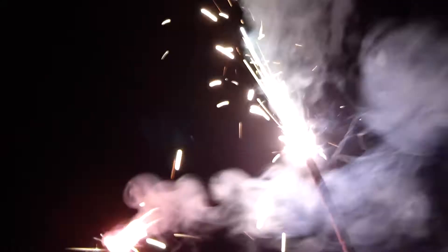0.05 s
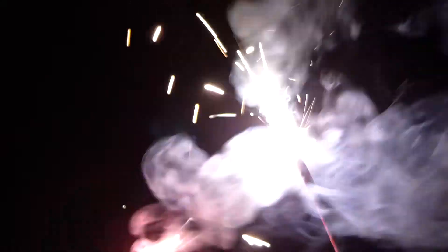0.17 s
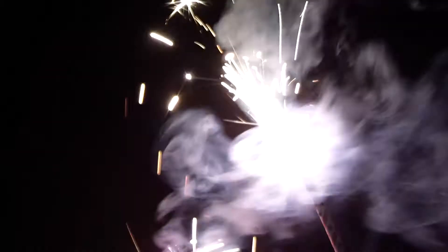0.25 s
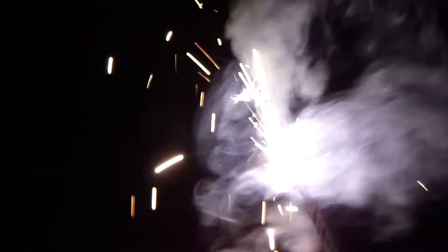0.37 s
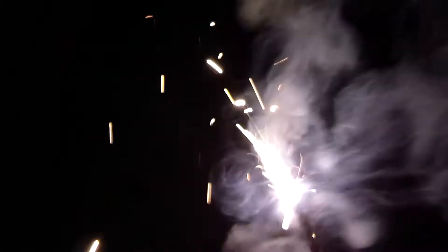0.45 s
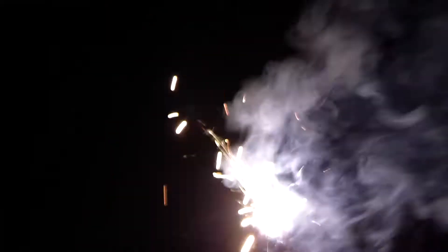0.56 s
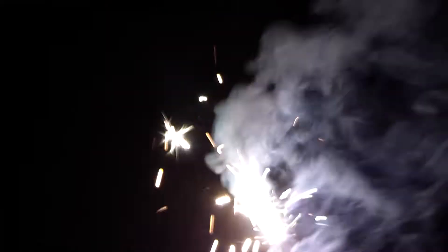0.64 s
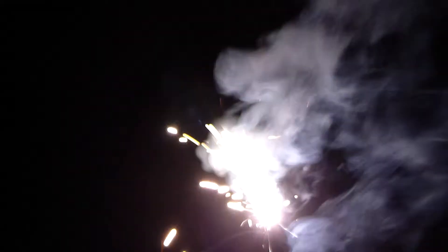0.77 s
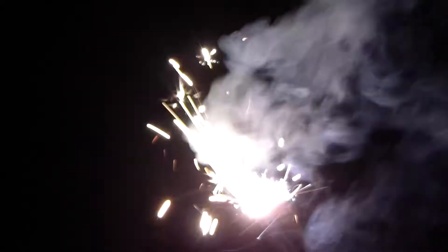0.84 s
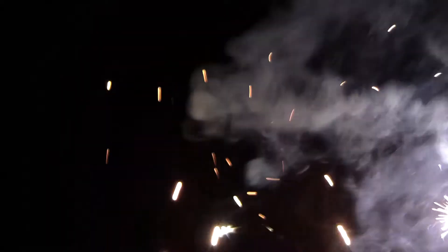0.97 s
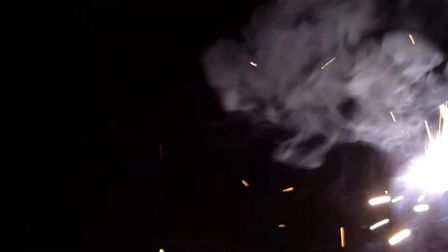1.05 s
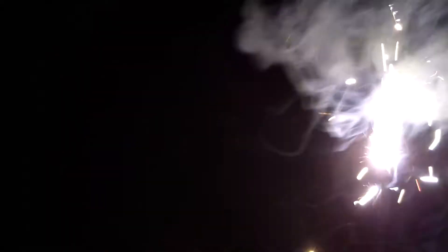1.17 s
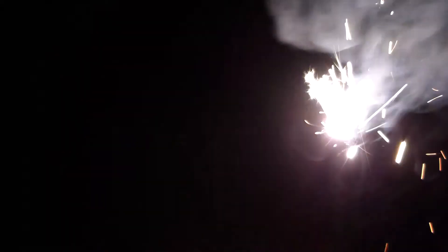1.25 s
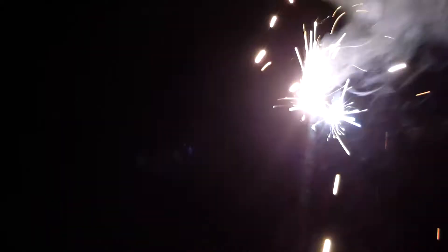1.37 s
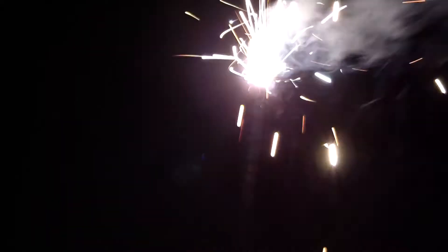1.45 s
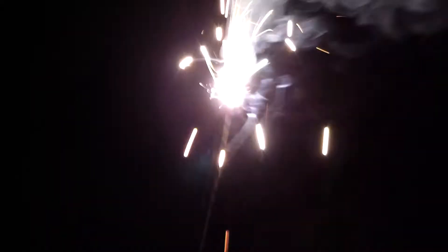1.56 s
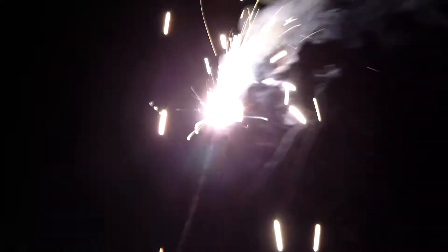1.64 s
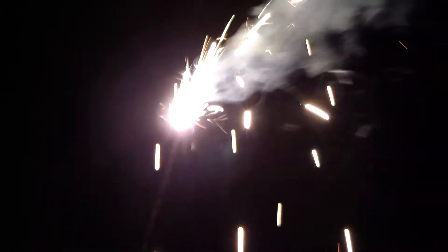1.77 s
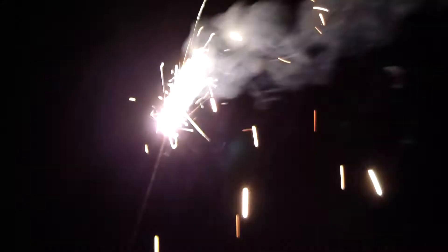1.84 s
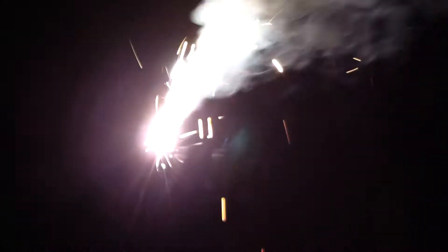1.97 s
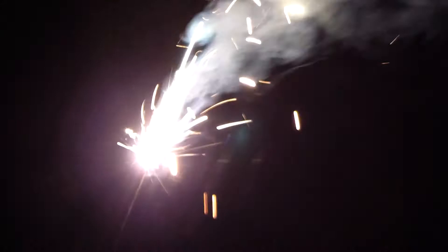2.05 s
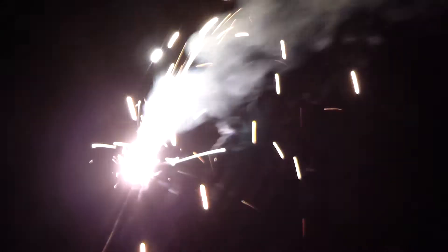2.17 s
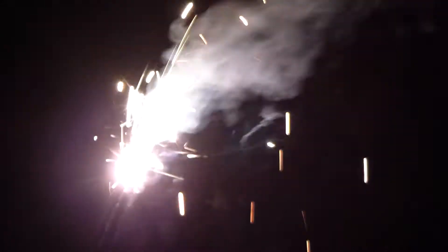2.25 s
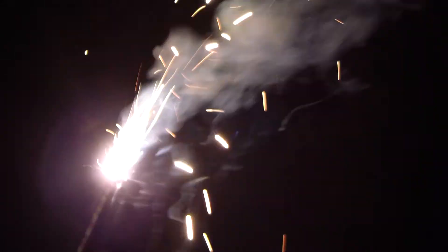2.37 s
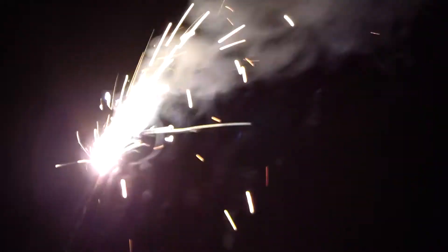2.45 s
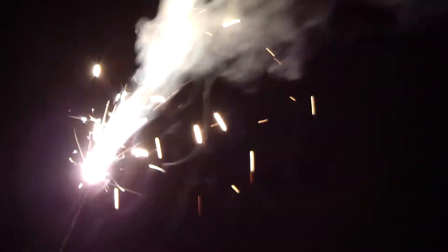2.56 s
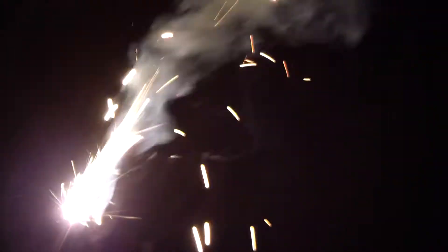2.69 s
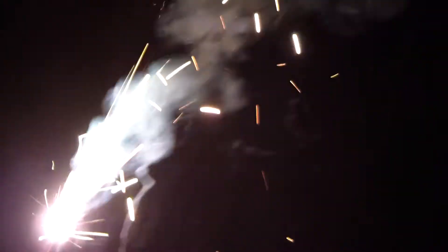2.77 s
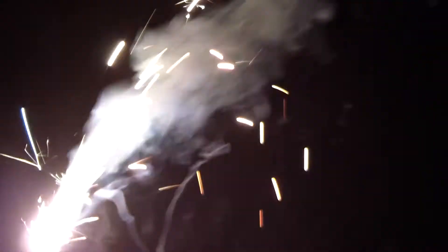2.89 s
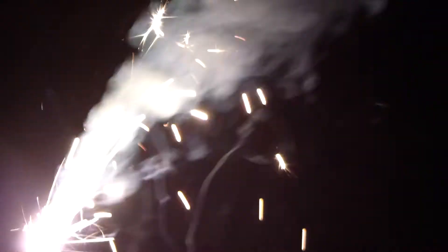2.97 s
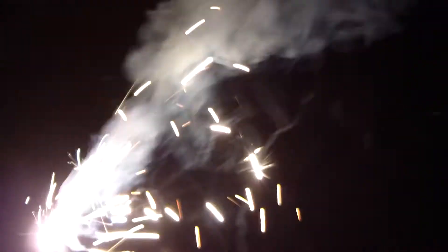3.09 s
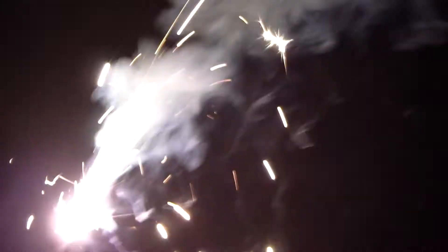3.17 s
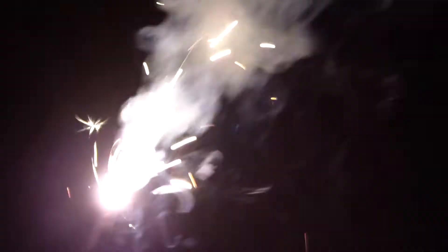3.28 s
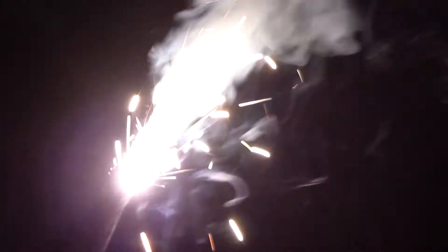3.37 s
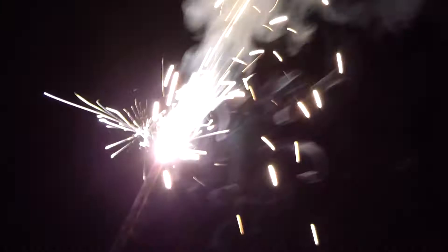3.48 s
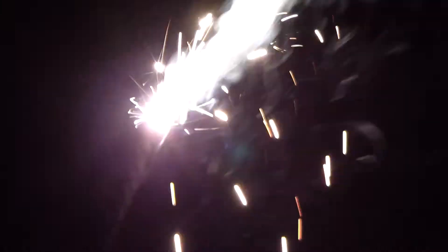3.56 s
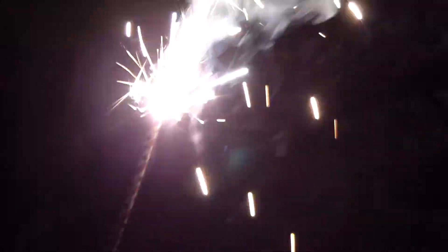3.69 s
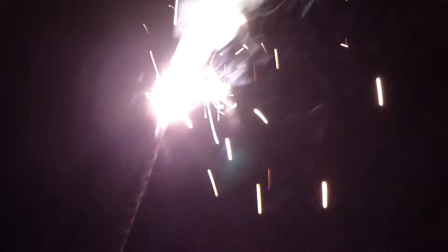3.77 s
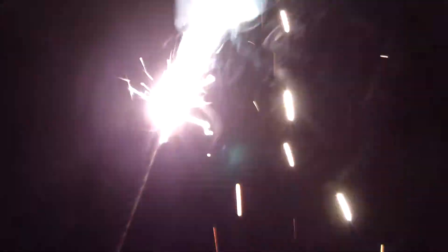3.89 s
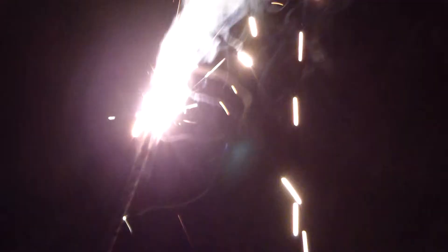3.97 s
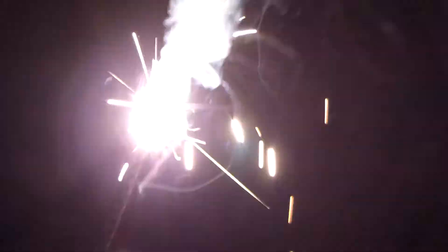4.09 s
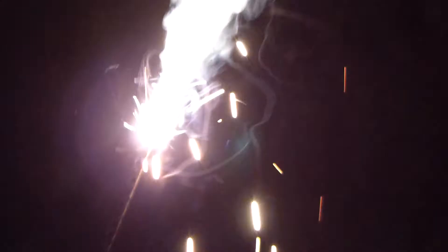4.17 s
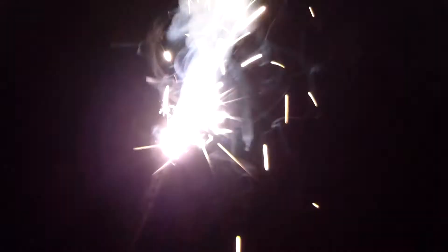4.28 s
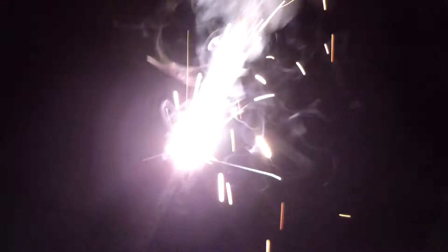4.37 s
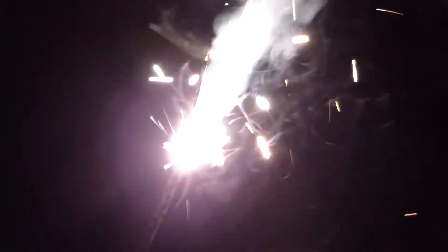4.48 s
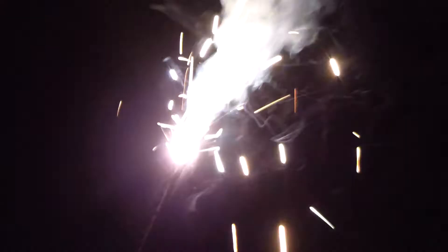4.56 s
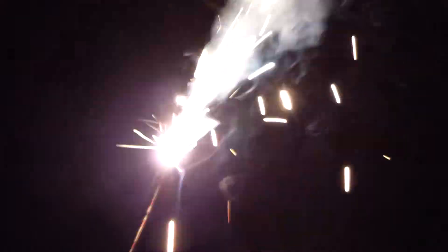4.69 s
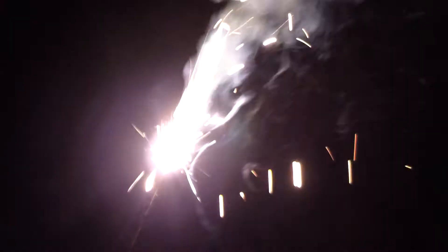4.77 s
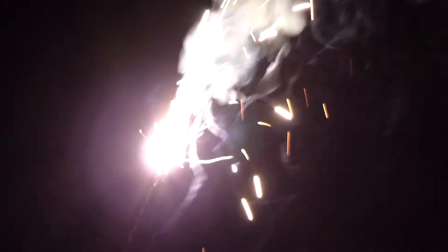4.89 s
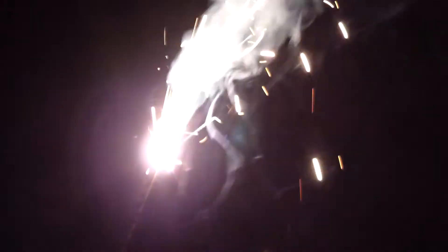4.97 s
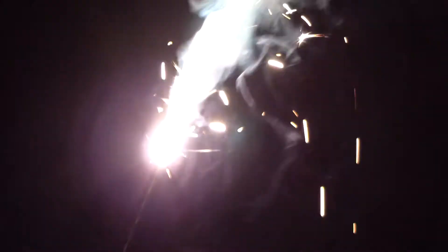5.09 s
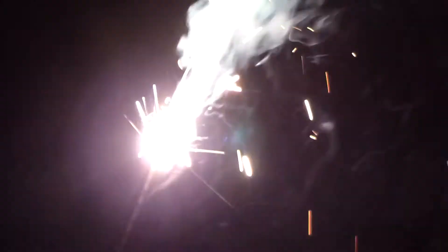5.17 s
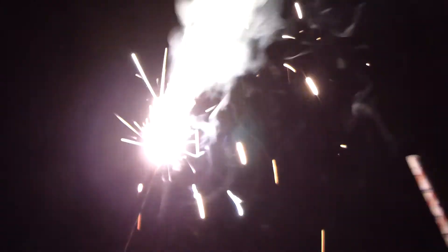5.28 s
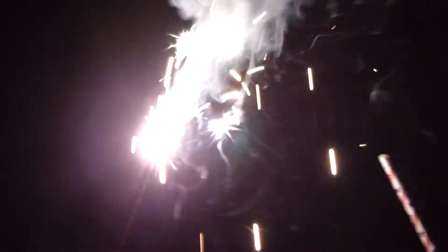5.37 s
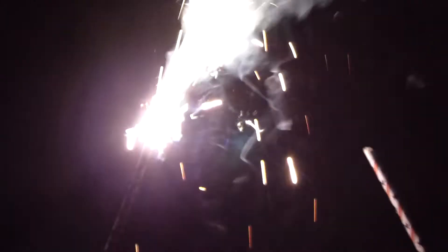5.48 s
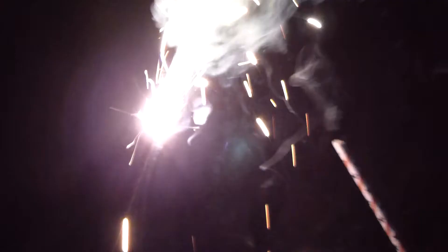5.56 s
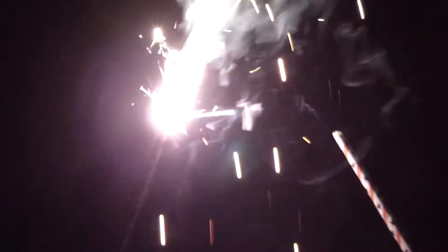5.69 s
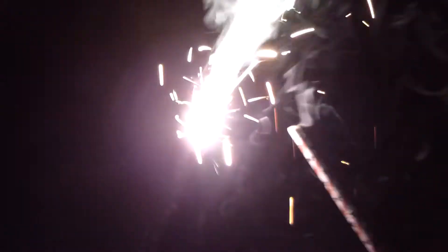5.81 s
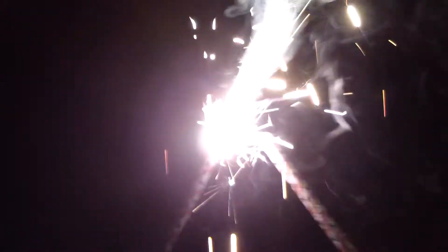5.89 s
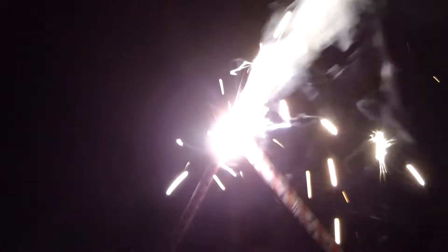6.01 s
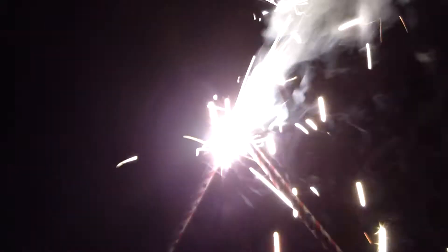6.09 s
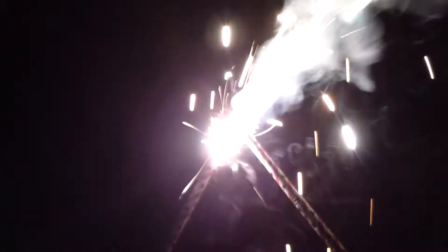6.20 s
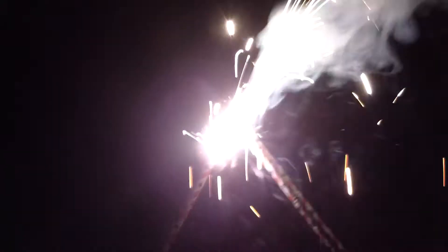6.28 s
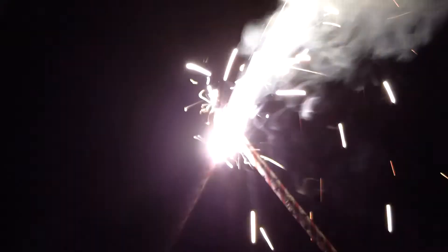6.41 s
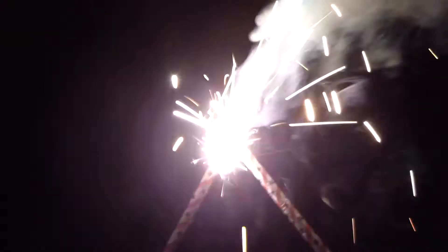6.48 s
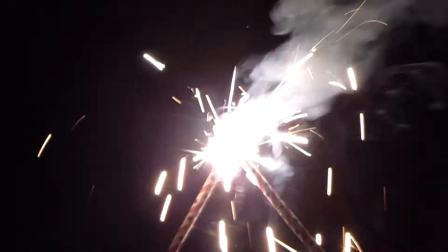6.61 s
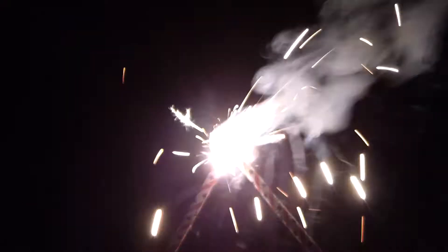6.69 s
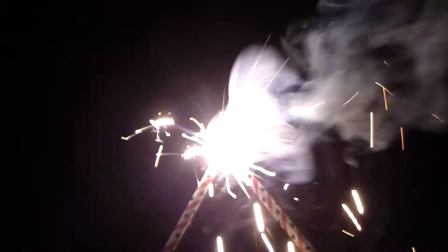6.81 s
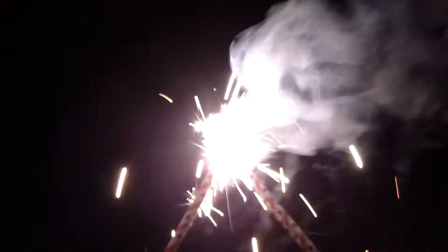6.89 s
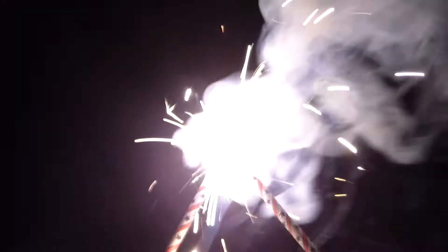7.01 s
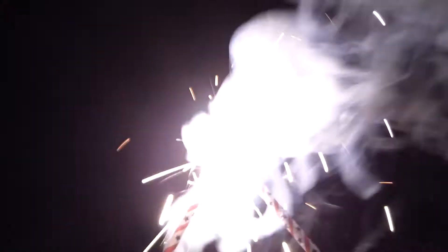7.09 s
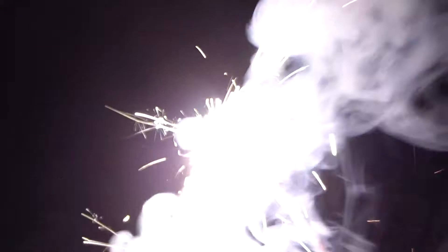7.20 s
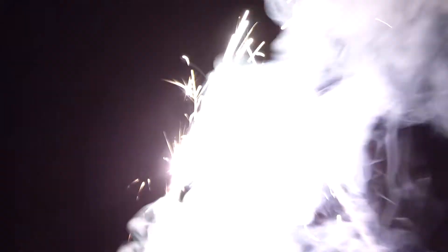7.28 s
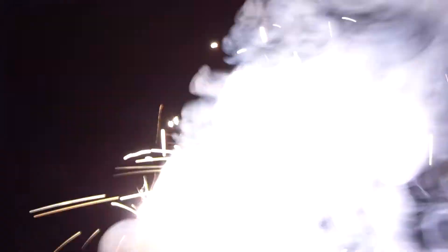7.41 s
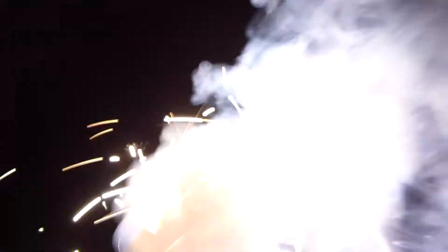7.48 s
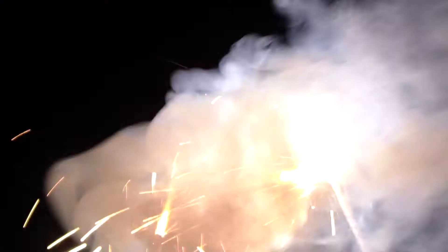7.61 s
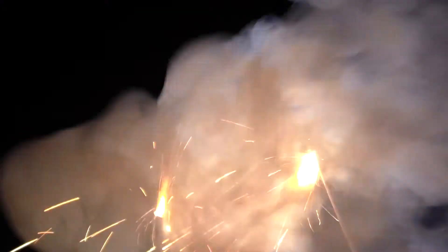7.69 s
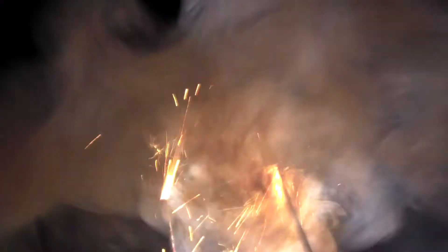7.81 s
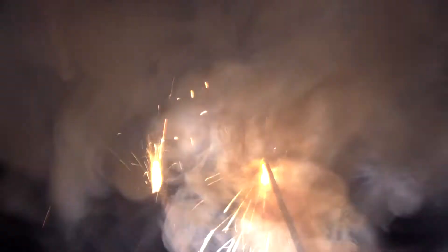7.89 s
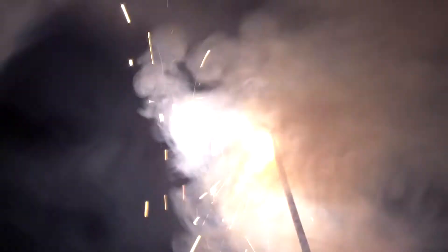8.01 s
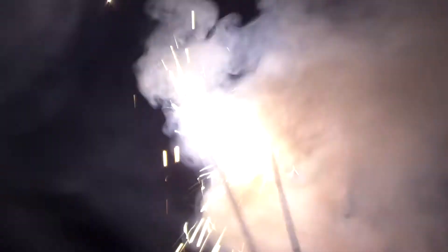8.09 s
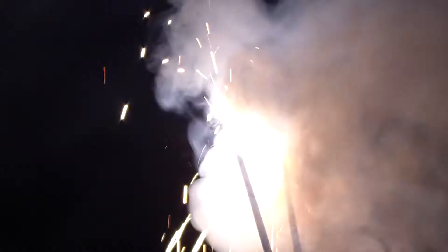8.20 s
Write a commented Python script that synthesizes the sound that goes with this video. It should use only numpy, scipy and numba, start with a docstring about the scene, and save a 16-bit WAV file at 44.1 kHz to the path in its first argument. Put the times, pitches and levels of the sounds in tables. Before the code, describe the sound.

Bright, gritty sparkler fizz outdoors with dense dry crackles and hard pops, swelling near the end into a louder, fuller rush of flame.

```python
"""Hand-held sparklers burn close to a phone outdoors at night: thousands of tiny shock pulses from bursting metal
grains make a sizzle that comes in spurts and lulls, and pops stand out as sharp bursts with fragments.
Shaped noise makes the flame's roar, which swells when a second stick lights, and the low rumble of a light wind.
A nearby surface (the phone or the hand) returns a short echo that follows the stick."""
import sys
import numpy as np
from scipy import signal
from scipy.fft import rfft, irfft, next_fast_len
from scipy.io import wavfile
from scipy.ndimage import uniform_filter1d, map_coordinates
from numba import njit

SR = 44100
rng = np.random.default_rng(int(sys.argv[2]) if len(sys.argv) > 2 else 0)


def materialize(psi):
    """Save the field psi as 16-bit PCM at rate SR to the path in sys.argv[1].

    A 1-D psi becomes a single channel; in a 2-D psi each row is a channel.
    """
    bounded = np.clip(np.atleast_2d(psi).T, -1, 1)
    quanta = np.round(bounded * 32767).astype(np.int16)
    wavfile.write(sys.argv[1], SR, quanta)


N = 363825  # samples, 8.25 s
MS, US = 1e-3, 1e-6  # a millisecond and a microsecond, in seconds

# The tone of one burst after the air and the microphone. Each row: frequency in Hz, relative level in dB.
SPARK_TONE = [(90, -30), (150, -12.5), (409, -16), (549, -12.5), (798, -15.5), (1070, -11.5), (1410, -11.5),
              (4420, -5.5), (6680, -5.5), (8300, -2.5), (10700, 0.5), (15300, -0.5), (18000, -7)]


def undb(db):
    """Turn decibels into a plain factor."""
    return 10 ** (np.asarray(db) / 20)


def unit(x):
    """Scale a signal to an average (RMS) strength of 1."""
    return x / np.sqrt(np.mean(x ** 2))


def columns(table):
    """Draw straight lines between the rows: each column after the time becomes one value a sample."""
    seconds, *rest = np.transpose(table)
    return [np.interp(np.arange(N) / SR, seconds, column) for column in rest]


def response(points, size=2048):
    """Make a click with the given tone whose energy comes as early as possible (folded cepstrum)."""
    hz, db = np.transpose(points)
    grid = np.maximum(np.arange(size // 2 + 1), .5) * SR / size
    level = undb(np.interp(np.log(grid), np.log(hz), db))
    cepstrum = irfft(np.log(level))
    # folding the second half onto the first leaves nothing before time zero
    cepstrum[1:size // 2] *= 2
    cepstrum[size // 2 + 1:] = 0
    return irfft(np.exp(rfft(cepstrum)))


def colour(x, points):
    """Give a signal the tone listed in a table."""
    return signal.fftconvolve(x, response(points))[:N]


def walk(rate):
    """A smooth random wavering with an RMS of 1: about `rate` new levels a second, averaged twice."""
    hold = int(SR / rate)
    steps = np.repeat(rng.standard_normal(N // hold + 1), hold)
    smooth = uniform_filter1d(uniform_filter1d(steps, hold), hold)
    return unit(smooth[:N])


def wind(wind_db, own_db=-15.0):
    """Low gusts buffet both ports nearly alike, and single puffs knock them: a quick dip, a slow rebound."""
    # The tone of the rumble. Each row: frequency in Hz, relative level in dB.
    wind_tone = [(12, -8), (22, 0), (40, -1), (62, -4), (80, -15), (250, -24), (600, -50)]
    # Puffs of air. Each row: time in seconds, level in dB, length scale in ms.
    puff_list = [(2.143, -32, 1.8), (2.187, -22.5, 2.1)]
    buffet = undb(2.0 * walk(33))
    shared, own = (unit(colour(rng.standard_normal(N) * buffet, wind_tone)) for _ in range(2))
    t, puffs = np.arange(N) / SR, 0
    for start, db, ms in puff_list:
        u = (t - start) / (ms * MS)
        dip = np.exp(-(2 * u) ** 2)
        rebound = 0.29 * np.exp(-((u - 2.5) / 2.3) ** 2)
        puffs = puffs + undb(db) * (rebound - dip)
    # a weak extra part pushes the two ports in opposite directions
    opposed = undb(own_db) * own * np.array([[-1], [1]])
    return puffs + undb(wind_db) * (shared + opposed)


def flame(roar_db):
    """The flame is a turbulent jet of gas: shaped noise that flutters quickly."""
    # The tone of the roar. Each row: frequency in Hz, relative level in dB.
    roar_tone = [(35, -41), (60, 2), (220, 2.5), (413, -5), (520, -1.5), (1110, 1), (1480, 0), (5560, -1.5),
                 (7000, -1.5), (8100, 1), (9000, -21), (11700, -59), (19800, -120)]
    flutter = undb(2.0 * walk(40) + 2.0 * walk(300))
    return undb(roar_db) * unit(colour(rng.standard_normal(N) * flutter, roar_tone))


def echoes(pair, echo_ms):
    """A small close surface returns only the upper middle; its comb of dips slides as the stick moves."""
    # Strength of the near echo: fainter at the start, while the stick dips low and during the flare.
    # Each row: time in seconds, echo level in dB.
    echo_strength = [(0, -20), (.6, -7), (2.2, -7), (2.7, -11), (3.5, -8), (7.2, -7), (7.5, -13), (7.9, -7),
                     (8.25, -7)]
    echo_band_hz = (4300, 11500)
    ground_ms, ground_db = 1.72, -22.5  # a weak echo off the ground
    band = signal.butter(N=1, Wn=echo_band_hz, btype="band", fs=SR, output="sos")
    # read the sound a little late, between samples, so that the delay can glide
    back = np.arange(N) - echo_ms * MS * SR
    near = np.array([map_coordinates(c, [back], order=3) for c in signal.sosfiltfilt(band, pair)])
    far = np.roll(pair, int(ground_ms * MS * SR), axis=1)
    return pair + undb(columns(echo_strength)[0]) * near + undb(ground_db) * far


def two_ports(bursts, lead_us):
    """Each burst reaches the two ports microseconds apart; their difference is wave slope times lead."""
    shade_db, scatter_us = -1.7, 8.0  # the left port's treble is a little weaker
    side_highpass_hz = 7000  # the left-right difference is kept only in the treble
    lead = (lead_us + scatter_us * rng.standard_normal(N)) * US
    mid = colour(bursts, SPARK_TONE)
    # multiplying a spectrum by 2j pi f gives the slope of the wave
    size = next_fast_len(N)
    spectrum = rfft(colour(bursts * lead / 2, SPARK_TONE), size)
    slope = irfft(spectrum * 2j * np.pi * np.fft.rfftfreq(size, 1 / SR), size)[:N]
    treble = signal.butter(N=2, Wn=side_highpass_hz, btype="high", fs=SR, output="sos")
    side = signal.sosfiltfilt(treble, slope + mid * (undb(shade_db / 2) - 1))
    return np.array([mid + side, mid - side])


def random_pops(flicker_db):
    """Further pops at random times, more often in a spurt and seldom in a lull: rows of seconds, dB."""
    pops_per_s, level_db, spread_db = 12, 2, 3.4
    often = np.cumsum(undb(2 * flicker_db))
    count = int(pops_per_s * N / SR)
    at = np.searchsorted(often, rng.random(count) * often[-1])
    return list(zip(at / SR, level_db + spread_db * rng.standard_normal(count)))


def pops(events, count=4):
    """Each pop is a sharp burst amid a short shower of smaller fragments."""
    fragments_db, spread_db, shower_ms = -11, 3, .9
    body, body_spread = .5, .3
    crack, push = np.zeros((2, N))
    for (start, db), row in zip(events, rng.standard_normal((len(events), 3 * count))):
        late, size, sign = row.reshape(3, count)
        crack[int(start * SR)] -= undb(db)
        # some pops push the air for longer and have more body than others
        push[int(start * SR)] -= undb(db) * max(body + body_spread * size[0], 0)
        # fragments fall shortly before or after the crack
        at = ((start + shower_ms * MS * late) * SR).astype(int)
        fragments = undb(db + fragments_db + spread_db * size) * np.sign(sign)
        np.add.at(crack, np.clip(at, 0, N - 1), fragments)
    return crack + uniform_filter1d(push, size=7)


def sputter_db():
    """The burn's rise and fall in dB: bell-shaped spurts and lulls over a quick random wavering."""
    # The plainest spurts (+) and lulls (-). Each row: time in seconds, change in dB, half-length in ms.
    spurts = [(0.077, 5, 40), (0.615, -9.5, 13), (0.804, -6.5, 15), (0.947, -7, 10), (1.006, 8, 6),
              (1.076, -14, 5), (1.194, 8, 13), (1.368, -8, 9), (1.426, -5, 20), (1.477, 7, 8),
              (1.741, 8, 7), (1.904, -8, 10), (2.072, 6, 19), (2.247, -14, 6), (2.419, 5, 8),
              (2.587, -7.5, 11), (2.886, 6, 14), (2.928, -6, 13), (3.012, 6, 22), (3.092, -8, 12),
              (3.263, 8.5, 28), (3.786, 8, 10), (3.859, 9, 7), (4.419, 3.5, 30), (4.667, 10, 8),
              (4.733, 9, 7), (4.771, -7, 11), (5.03, 9, 7), (5.145, -10, 15), (5.225, -8, 6),
              (5.5, 3.5, 40), (5.855, -10, 20), (6.051, -6.5, 7), (6.182, 9, 7), (6.325, -5, 12),
              (6.627, 8, 8), (6.666, -11, 13), (6.908, -8, 6), (7.084, 5, 18), (7.153, -5.5, 22),
              (7.336, -5, 22), (7.548, 7, 54), (7.647, -5, 13), (7.74, 8, 14), (7.827, -9, 8),
              (7.91, -16, 17), (7.985, 6, 15)]
    waver_db, wavers_per_s = 1.5, 30
    # worked out once every 32 samples, then held
    t = np.arange(N // 32 + 1) * 32 / SR
    change_db = np.zeros(len(t))
    for middle, db, ms in spurts:
        change_db += db * np.exp(-.5 * ((t - middle) / (ms * MS)) ** 2)
    return np.repeat(change_db, 32)[:N] + waver_db * walk(wavers_per_s)


def sizzle(burn_db, rate=2500, spread_db=5.0, hiss_db=-1.5):
    """Grains burst at random, about `rate` a second, most small and a few large, over the hiss of hot gas."""
    chance = rng.random((3, N))
    clusters_db = 1.4 * walk(60) + 2.0 * walk(250) + 1.6 * walk(1200)
    size = undb(spread_db * np.minimum(-np.log(1 - chance[1]), 4.2))
    sign = np.where(chance[2] < .75, -1, 1)  # in three of four the pressure dips first
    bursts = (chance[0] < rate / SR) * size * sign
    gas = undb(hiss_db) * rng.standard_normal(N)
    return unit((unit(bursts) + gas) * undb(clusters_db)) * undb(burn_db)


def top_cut(x):
    """Remove the highest treble with a steep filter."""
    return signal.sosfiltfilt(signal.ellip(10, .1, 40, 15800, fs=SR, output="sos"), x)  # Hz


def scene():
    """Join the bursts and the flame, add their echoes, then the wind."""
    # How hard the tip burns. Each row: time in seconds, sizzle level in dB before the sputter.
    burn = [(0.0, -24), (0.5, -20.5), (0.75, -24.5), (1.4, -24), (2.0, -21.5), (2.5, -24), (3.0, -26.5),
            (3.5, -24), (4.5, -24), (5.5, -22), (6.5, -24), (7.0, -22.5), (7.3, -18), (7.75, -18.5),
            (8.0, -12.5), (8.25, -16)]
    # The flame's roar, swelling as the second stick lights.
    # Each row: time in seconds, level in dB before the sputter.
    flare = [(0, -44), (.4, -35), (.7, -41.5), (6.8, -43.5), (7.33, -31.5), (7.47, -19.5), (7.72, -21.5),
             (7.87, -24.5), (8.25, -22)]
    # Wind rumble, one gust near 1.9 s and more at the end. Each row: time in seconds, level in dB.
    gusts = [(0, -51), (.8, -54), (1.55, -53), (1.88, -39), (2.05, -48), (2.4, -55), (4.5, -54), (5.6, -49),
             (6.1, -56), (7.1, -52), (7.5, -40), (8.25, -40)]
    # Where the tip is. Each row: time in seconds, near-echo delay in ms, lead of the left port in microseconds.
    place = [(0.0, 0.334, -5), (0.7, 0.324, -6), (1.0, 0.352, -13), (1.35, 0.388, -7), (2.3, 0.368, 1),
             (2.7, 0.33, 3.5), (3.0, 0.326, 3), (3.6, 0.394, -1), (4.6, 0.37, -2), (5.3, 0.37, -1),
             (5.6, 0.386, -2.5), (6.2, 0.368, -4), (6.9, 0.366, -3.5), (7.26, 0.346, -6), (7.6, 0.372, -6),
             (8.25, 0.378, -9)]
    # Pops at set times. Each row: time in seconds, level of the main crack in dB.
    timed_pops = [(0.0319, -2), (0.0681, 2.5), (0.3834, -0.5), (0.5189, 7), (0.6021, 3), (0.6262, -2),
                  (0.6575, 4.5), (0.702, -3), (0.7802, -1), (0.8468, 5), (0.9277, 1), (1.0176, 7),
                  (1.5524, 1.5), (1.7475, 6), (2.0725, 6), (2.1856, 6), (2.2301, 1), (2.2756, 0.5),
                  (2.3592, 4), (2.3776, 1), (2.4268, 1), (2.5407, 0), (2.7964, 5), (3.0496, 5), (3.2292, 6),
                  (3.2326, 7), (3.503, 7), (3.5772, 2), (3.7638, 0.5), (3.8621, 8), (4.0004, 1.5),
                  (4.1258, -1.5), (4.1604, 7), (4.241, 2), (4.5315, 4), (4.6649, 4), (4.7335, 0),
                  (4.7442, 4.5), (4.7608, -4), (4.8547, 1), (4.899, -2), (5.0295, 2), (5.0902, 4),
                  (5.158, -1), (5.2064, 0), (5.341, 2), (5.5797, 8), (5.5964, 4), (5.6393, 1.5),
                  (5.6937, 1), (5.9168, 7), (6.0066, 3), (6.0281, 3), (6.1008, 2), (6.1745, 0.5),
                  (6.5032, -3), (6.6288, 5.5), (6.8922, 3), (6.9258, 2.5), (7.0266, 5), (7.0852, -2),
                  (7.5353, 4), (7.6199, 5), (7.7519, 11), (7.8129, 9.5), (7.8532, 3), (7.8827, 7)]
    flicker_db = sputter_db()
    (burn_db,), (roar_db,), (wind_db,) = columns(burn), columns(flare), columns(gusts)
    echo_ms, lead_us = columns(place)
    # the sizzle is set by the energy of one spark, the pops by its peak
    spark = response(SPARK_TONE)
    spark_peak = np.max(np.abs(signal.hilbert(top_cut(spark))))
    bursts = sizzle(burn_db + flicker_db) / np.linalg.norm(spark)
    bursts += pops(list(timed_pops) + random_pops(flicker_db)) / spark_peak
    # the roar follows the sputter only in part
    fire = two_ports(bursts, lead_us) + flame(roar_db + .5 * flicker_db)
    return echoes(fire, echo_ms) + wind(wind_db)


@njit
def follow(peaks, floor, attack, release):
    """Follow the loudness: quick to rise, slow to let go, never under the floor."""
    out, level = np.empty(len(peaks)), floor
    for i in range(len(peaks)):
        level += (peaks[i] - level) * (attack if peaks[i] > level else release)
        out[i] = max(level, floor)
    return out


def record(dry):
    """The phone's gain control ducks the sound just after each loud pop; overloads clip, the top is cut."""
    top_db, ratio, attack_ms, release_ms = -16, 2.4, .8, 22  # ducking starts above top_db
    top = float(undb(top_db))
    loudest = np.max(np.abs(dry), axis=0)
    heard = follow(loudest, top, 1 / (attack_ms * MS * SR), 1 / (release_ms * MS * SR))
    gain = (top / heard) ** (1 - 1 / ratio)
    return top_cut(np.clip(dry * gain, -1, 1))


dry = scene()
out = record(dry)
materialize(out)
```